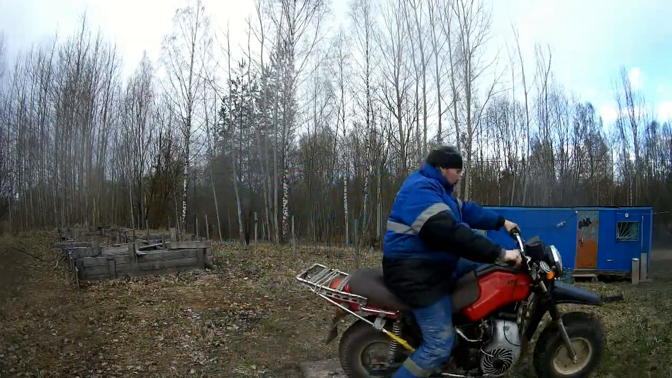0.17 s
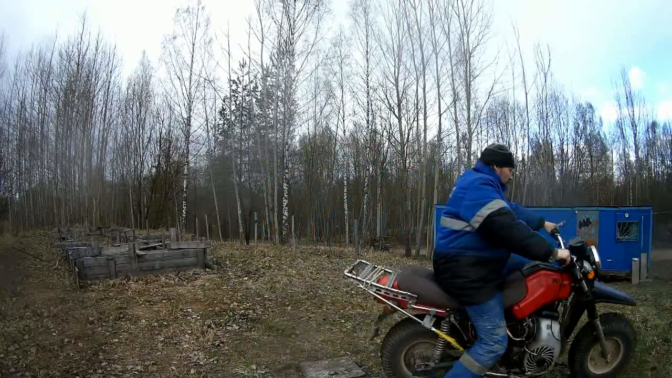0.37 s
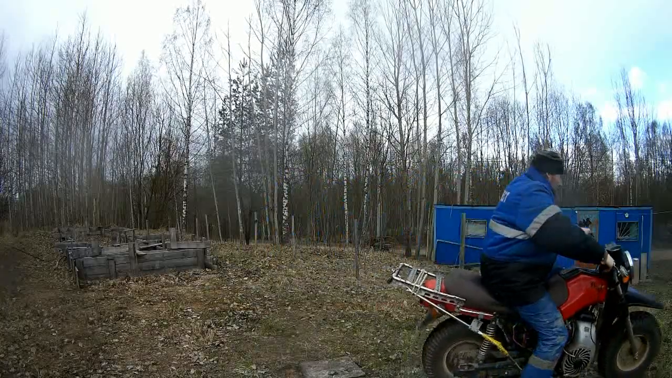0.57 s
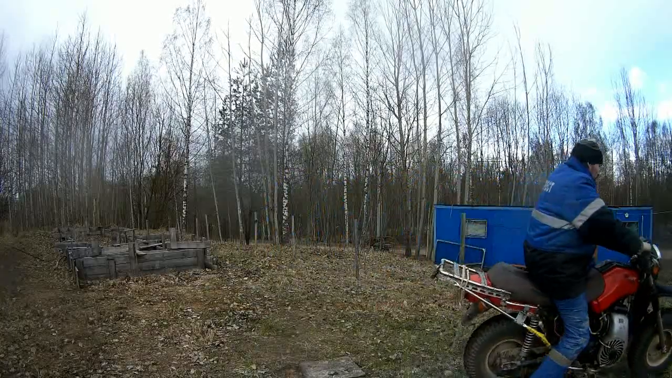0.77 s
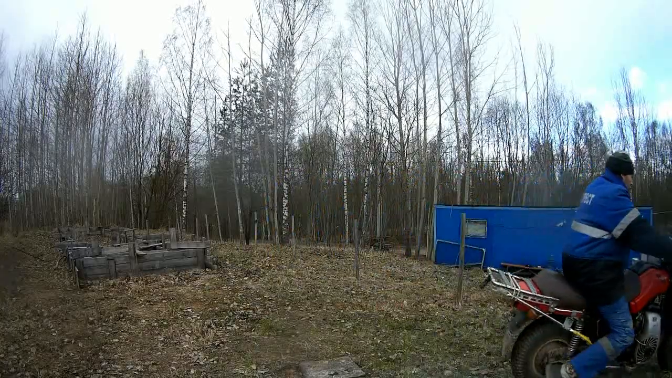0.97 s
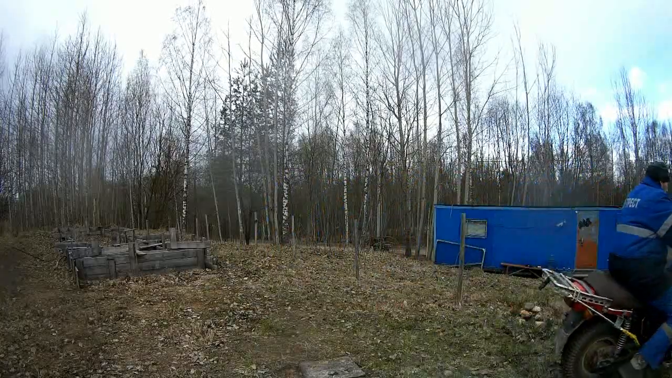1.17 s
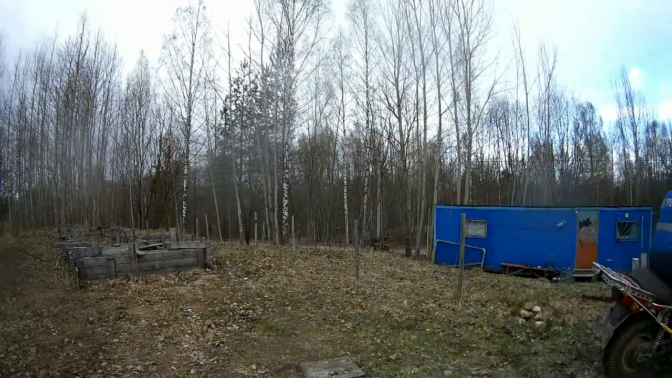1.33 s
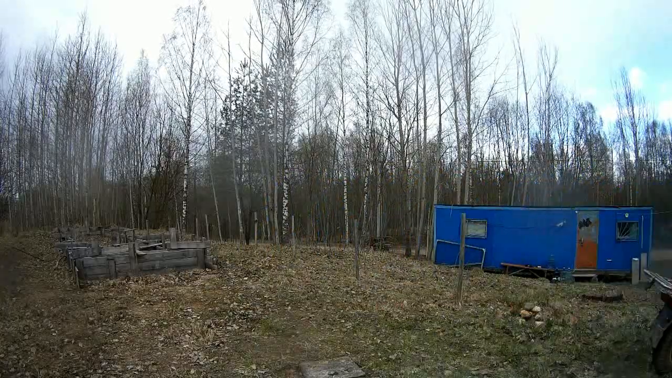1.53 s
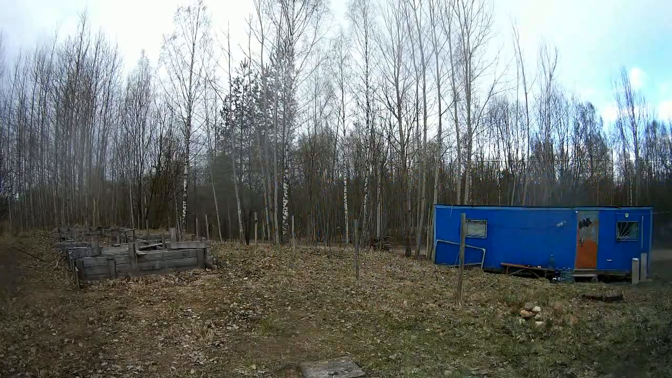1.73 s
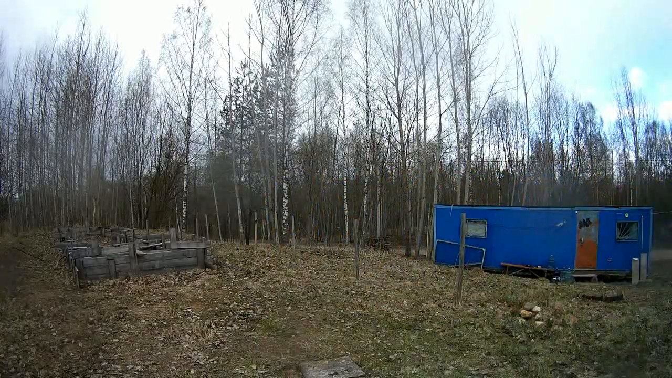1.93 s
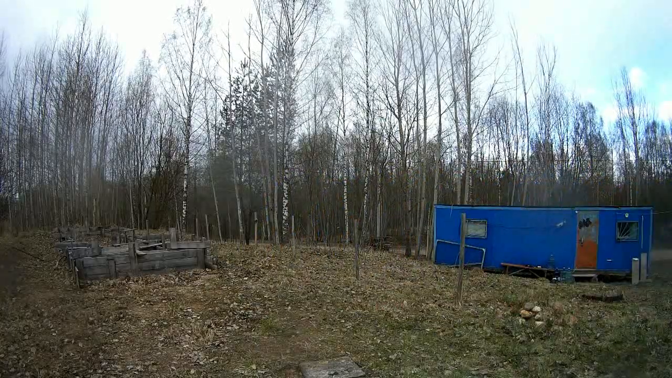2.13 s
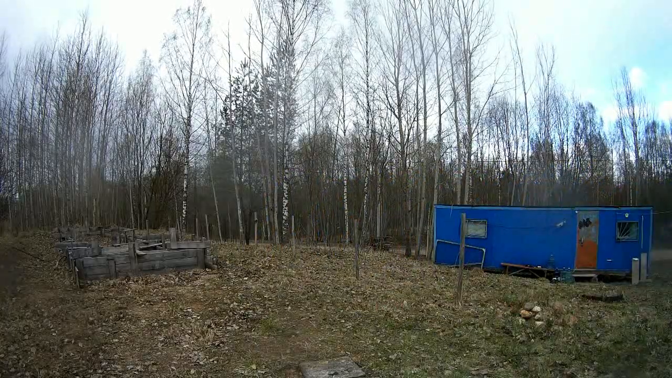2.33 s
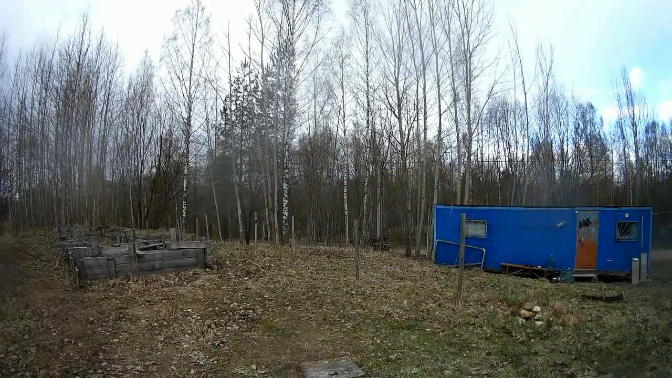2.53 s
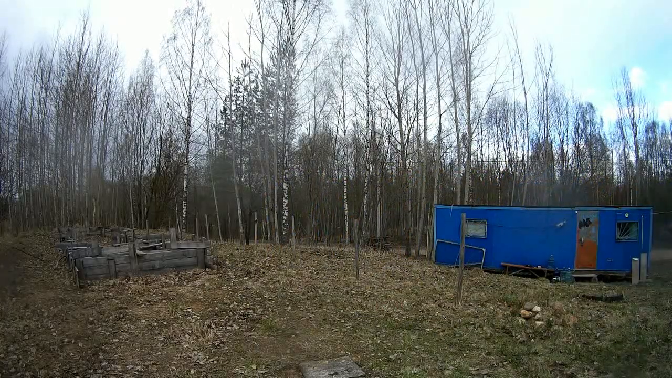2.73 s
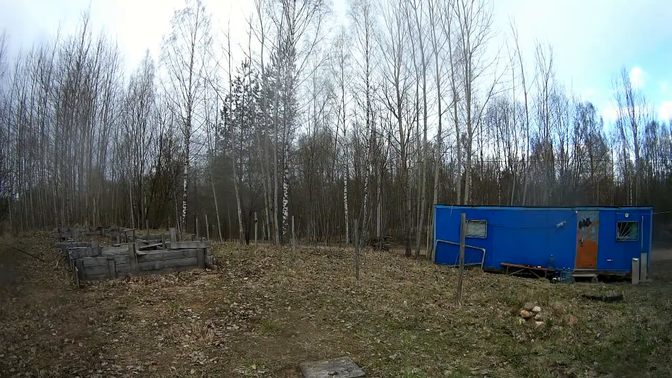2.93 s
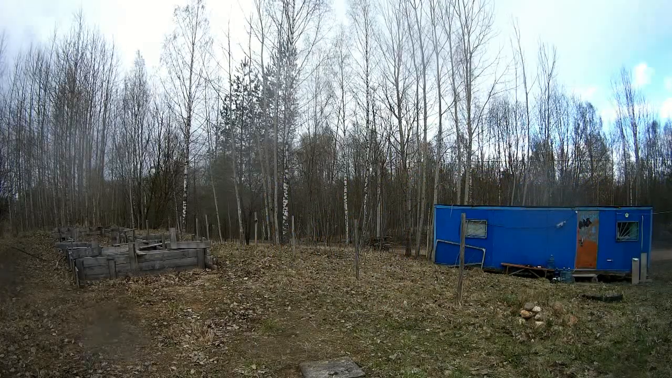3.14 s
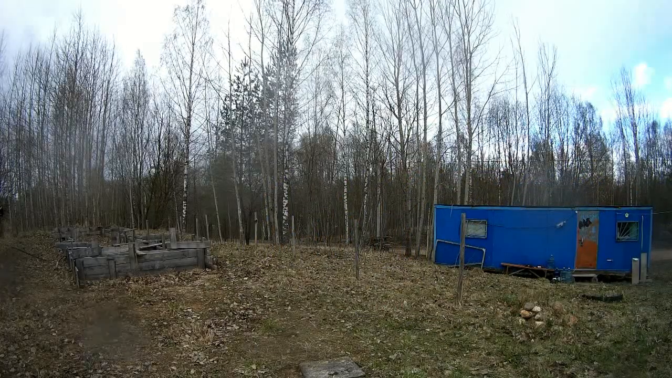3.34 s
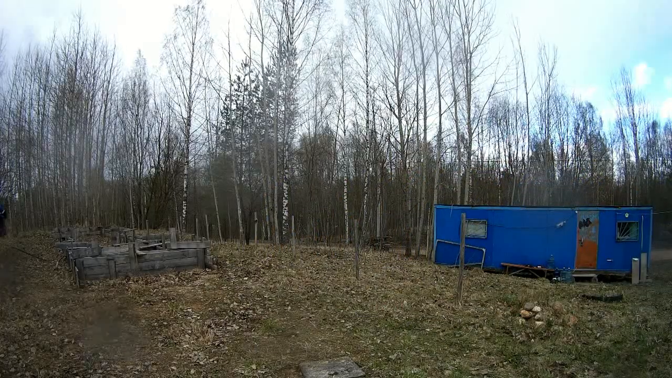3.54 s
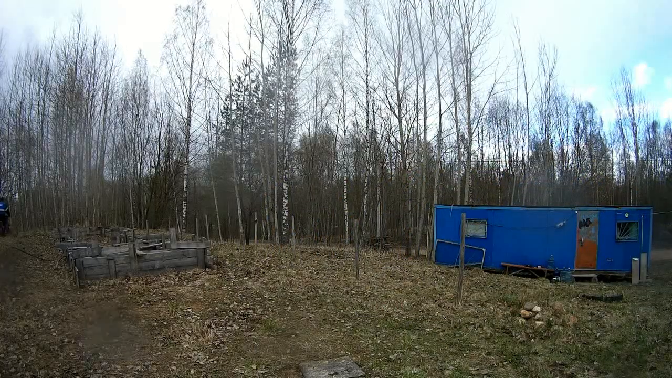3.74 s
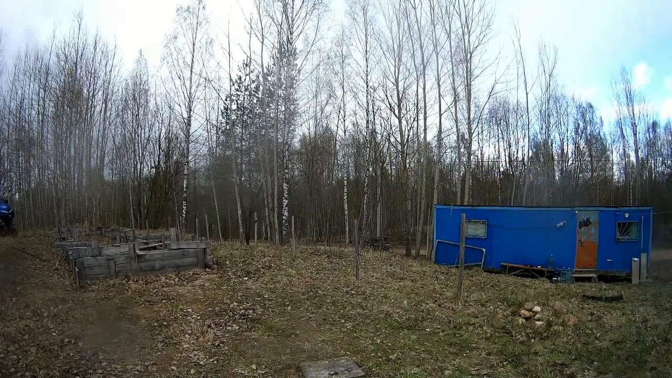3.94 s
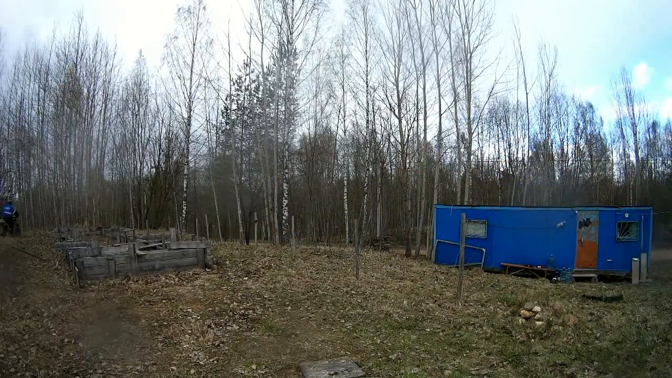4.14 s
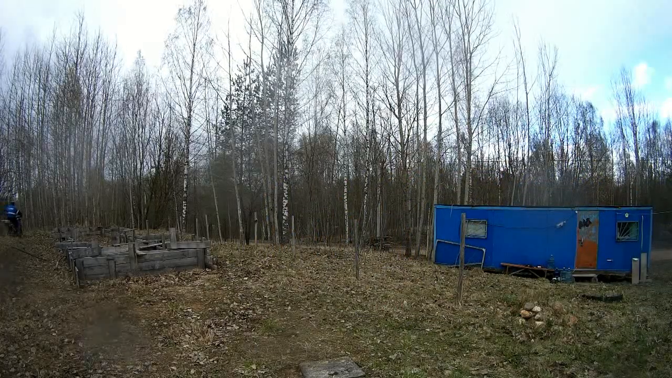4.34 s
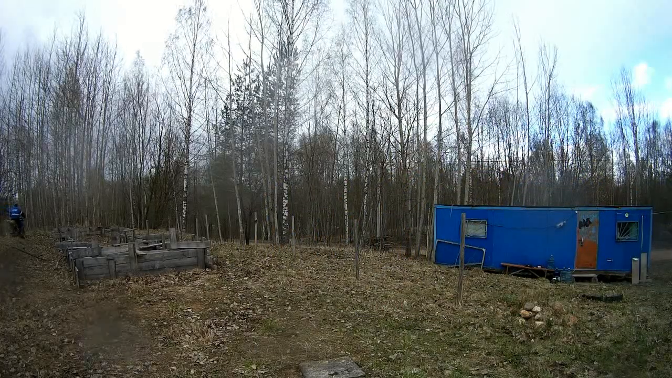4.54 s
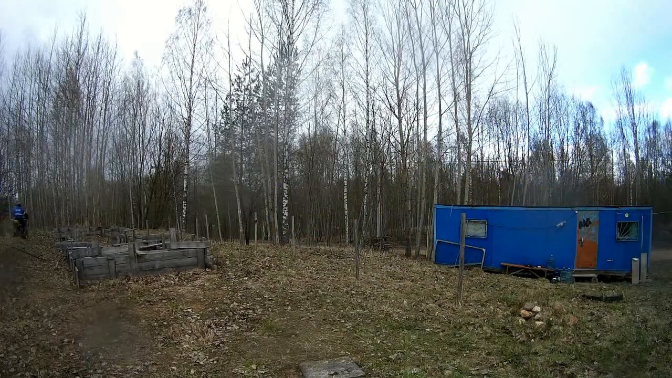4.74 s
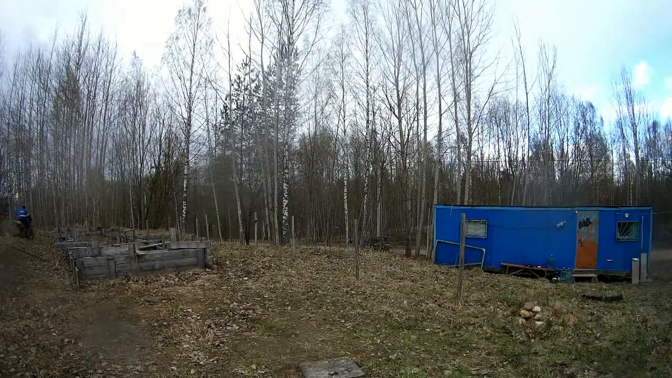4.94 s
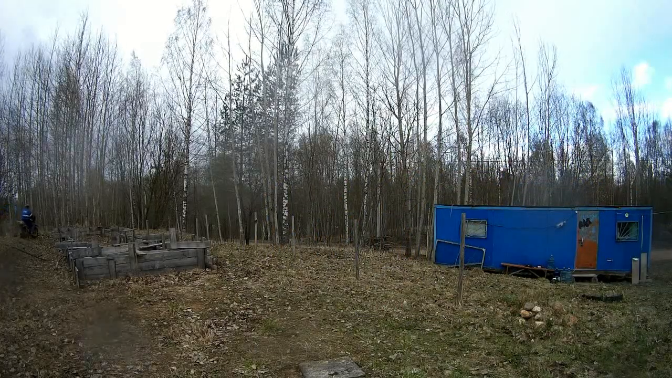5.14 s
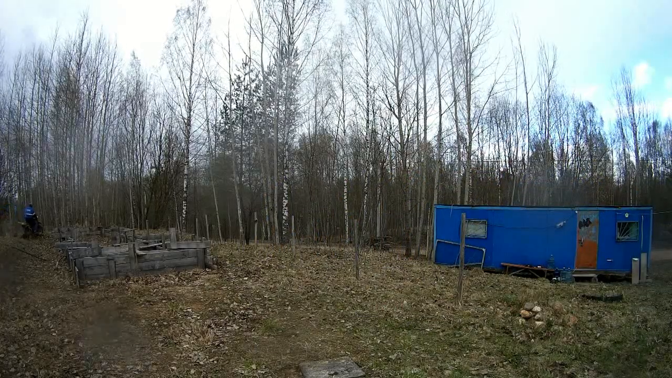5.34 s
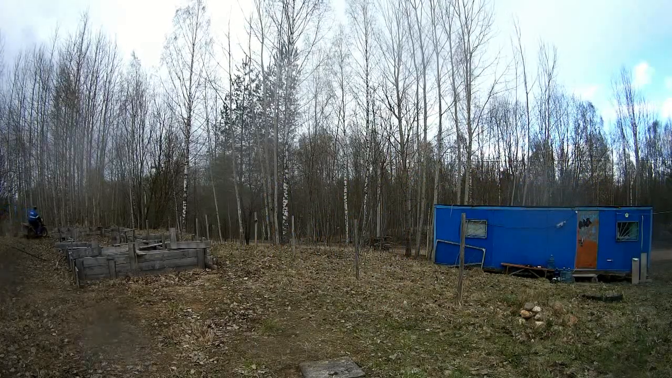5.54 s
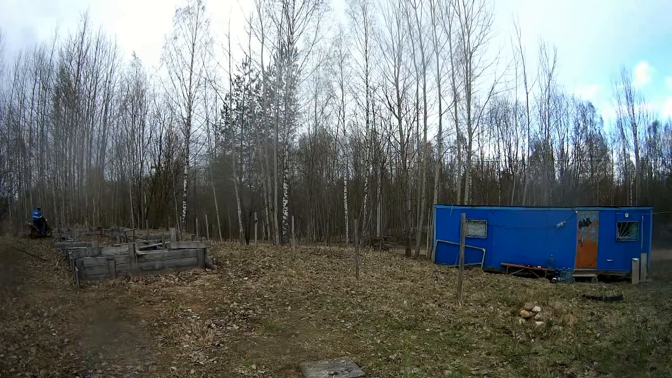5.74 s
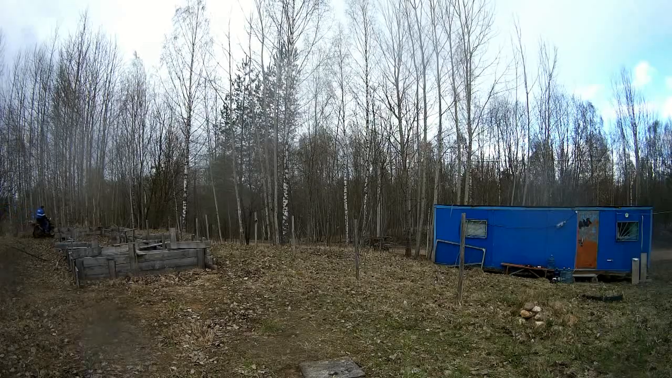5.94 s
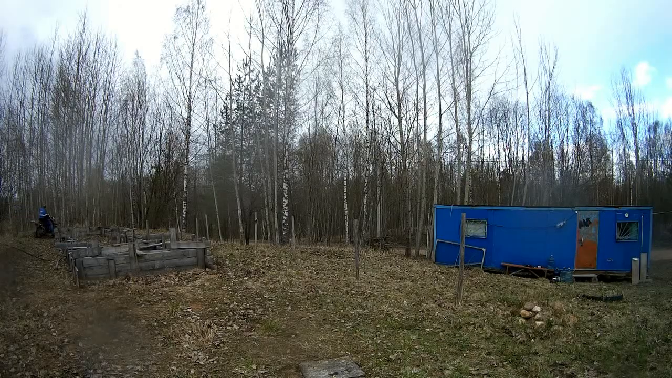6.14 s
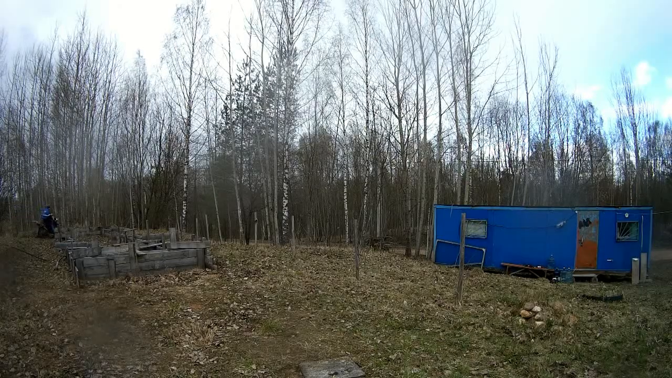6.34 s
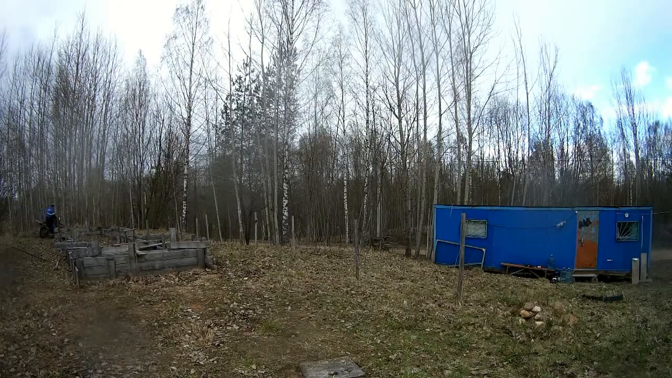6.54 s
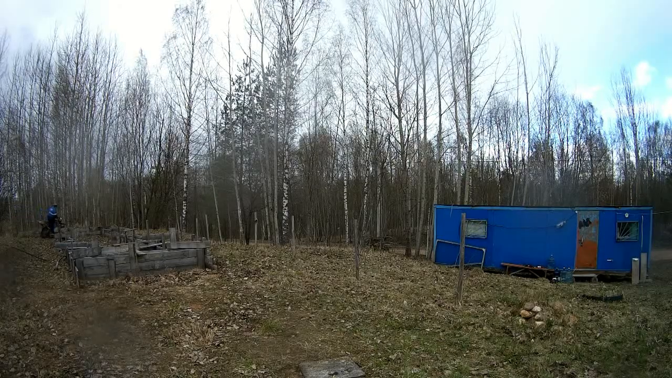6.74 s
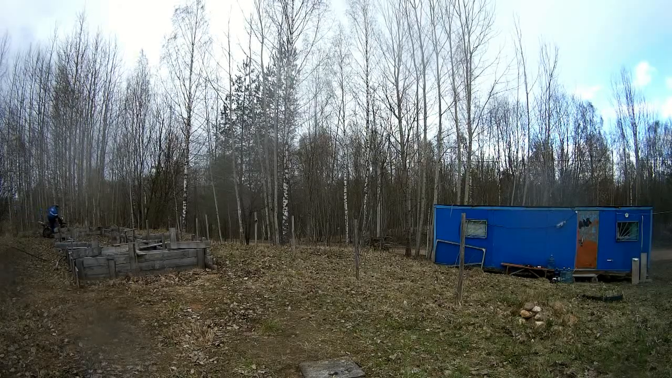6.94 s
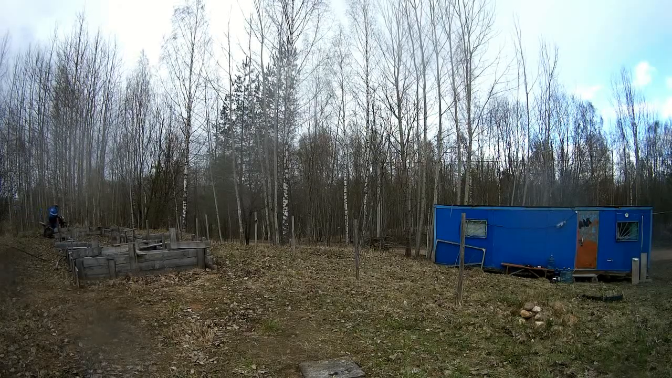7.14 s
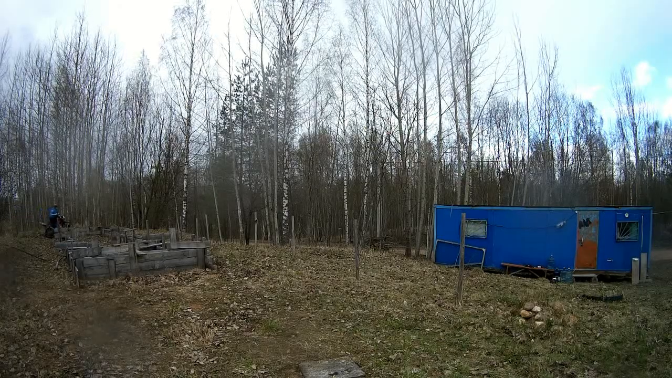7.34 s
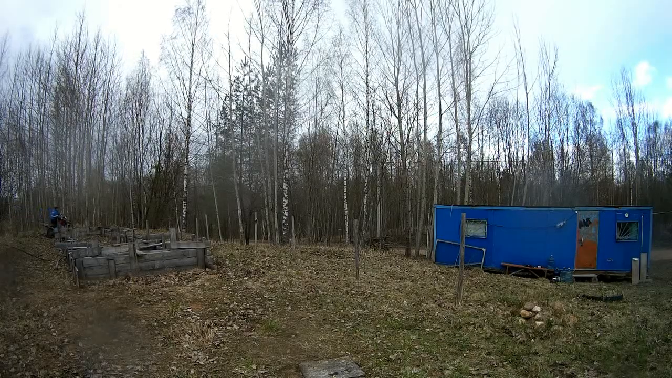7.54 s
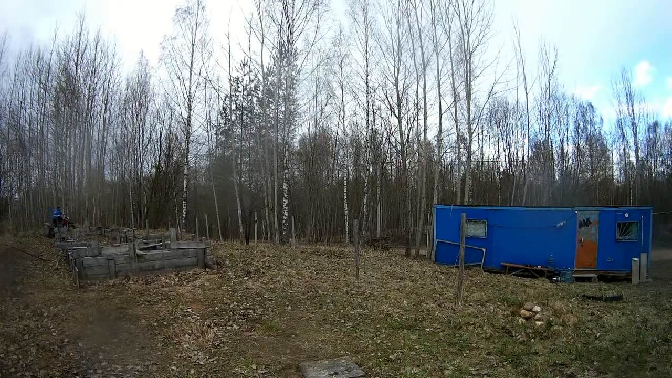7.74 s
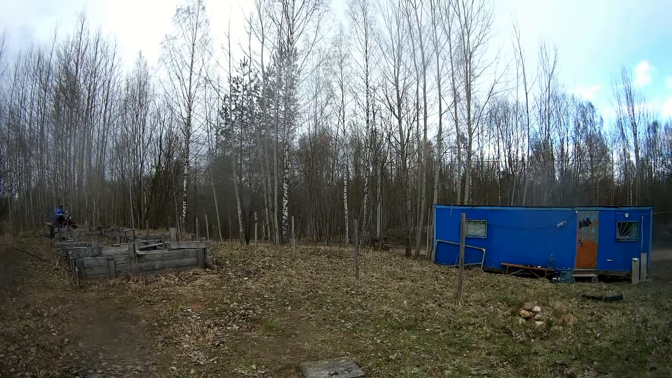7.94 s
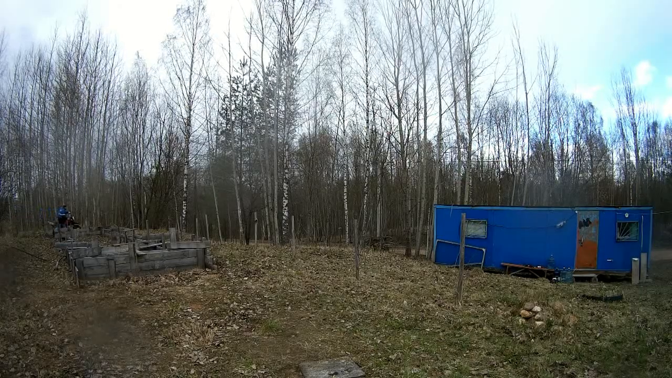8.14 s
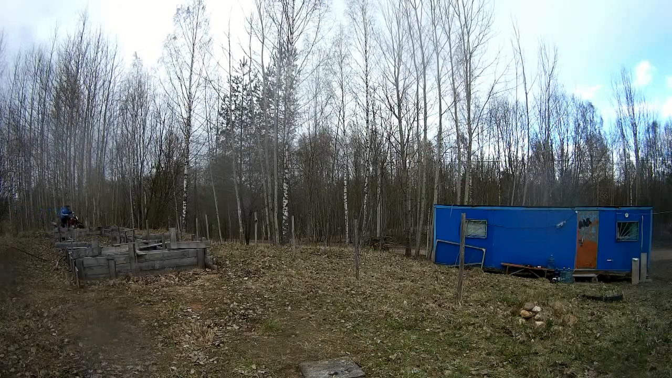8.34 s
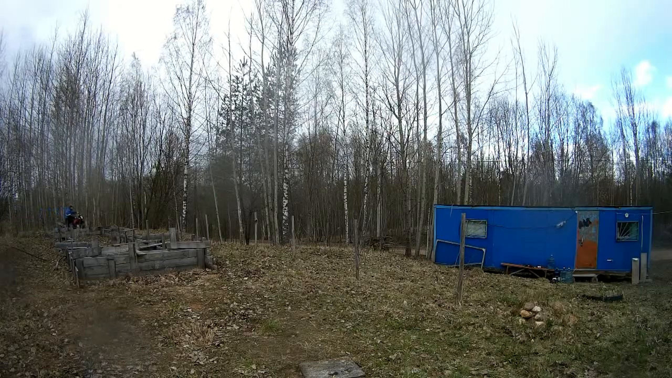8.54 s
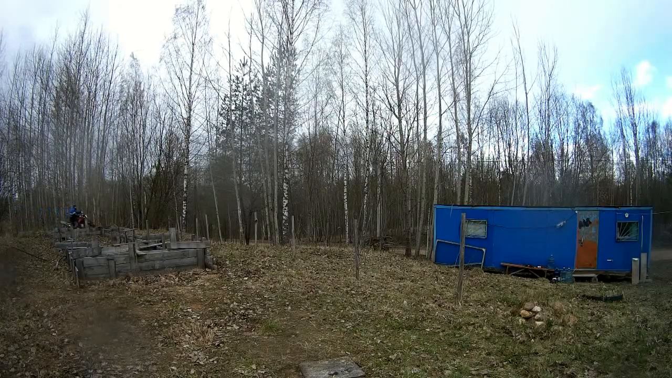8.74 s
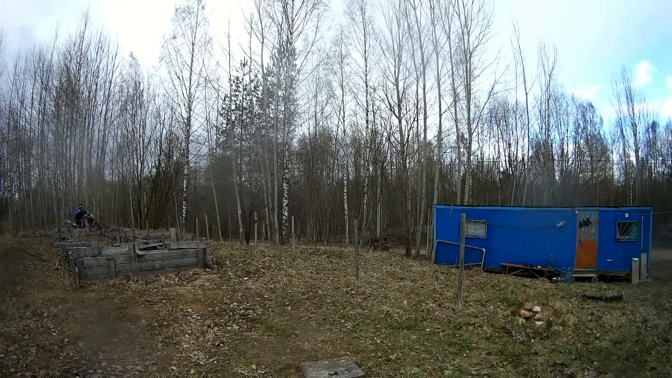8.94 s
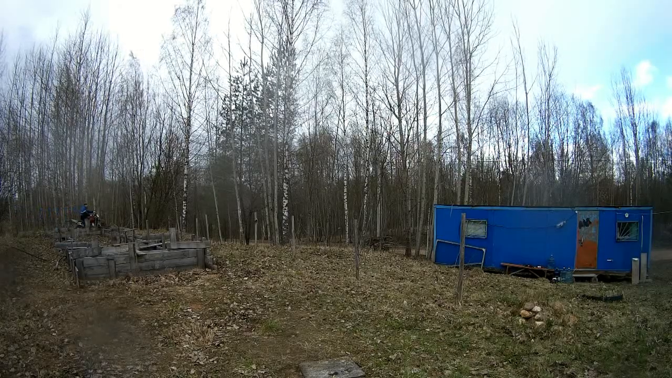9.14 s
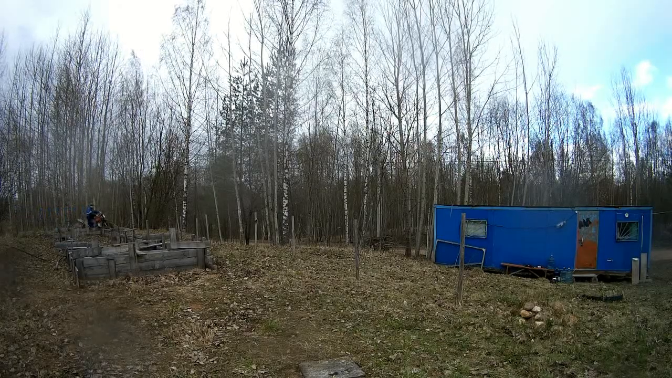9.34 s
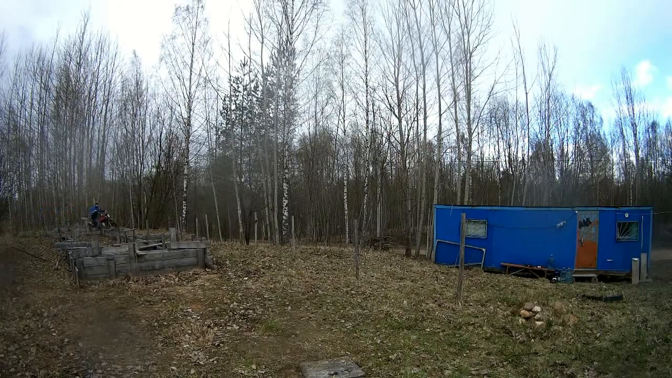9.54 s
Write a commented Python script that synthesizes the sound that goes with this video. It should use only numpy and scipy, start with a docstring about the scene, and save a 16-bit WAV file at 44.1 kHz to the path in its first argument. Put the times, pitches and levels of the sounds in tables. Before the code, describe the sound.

Close buzzy two-stroke motorbike rolls away, cuts suddenly to the same bike far off, idling unevenly then revving, with wind buffeting, leaf scuffs and twig snaps.

```python
"""In a forest clearing, a small two-stroke motorcycle rolls past close by, blips, pulls away and coasts. Then
the scene changes: the bike is far across the clearing, where it idles, revs, drops back and pulls again. There,
wind buffets the microphone, twigs and dry leaves crack nearby and thin high pips repeat for a while. Each turn
of the crank sends a gas pulse, weak where nothing burned, into resonances of silencer and tail pipe. Wind,
leaves and hiss are shaped noise; twigs are short noise bursts through a resonance."""
import sys
import numpy as np
from scipy import signal
from scipy.fft import rfft, irfft, next_fast_len
from scipy.io import wavfile
from scipy.ndimage import uniform_filter1d

SR = 44100
rng = np.random.default_rng(int(sys.argv[2]) if len(sys.argv) > 2 else 0)


def int16_out(signal):
    """Quantize to a 16-bit WAV file."""
    q = np.round(np.clip(np.atleast_2d(signal).T, -1, 1) * 32767)
    wavfile.write(sys.argv[1], SR, q.astype(np.int16))


N = 427769
TIME = np.arange(N) / SR
FAR_FROM_S = 3.16  # from here on the bike is across the clearing
CRUISE_PER_S = 40  # reference speed, strokes per second


def from_db(db):
    """Decibels to gain."""
    return 10 ** (np.asarray(db) / 20)


def rms_one(x):
    """Scale to unit rms."""
    return x / np.sqrt(np.mean(x ** 2) + 1e-20)


def in_time(rows):
    """Each column of a breakpoint curve, read at every sample."""
    s, *columns = np.transpose(rows)
    return [np.interp(TIME, s, c) for c in columns]


def drift(rate):
    """Random wander of unit rms: straight lines between `rate` random points per second."""
    knots = rng.standard_normal(int(N / SR * rate) + 2)
    return rms_one(np.interp(TIME * rate, np.arange(len(knots)), knots))


def lagging(x, lag_s, start):
    """Follow a control sluggishly, from a starting value."""
    r = np.exp(-1 / (lag_s * SR))
    return start + signal.lfilter([1 - r], [1, -r], x - start)


def swells(rows, edge_s):
    """Gain of events (start, length, dB) that rise, hold and fall."""
    gain = 0
    for s, length, db in rows:
        end = s + max(length, edge_s)
        corners = [s - edge_s, s + edge_s / 2, end, end + edge_s]
        gain = gain + from_db(db) * np.interp(TIME, corners, [0, 1, 1, 0])
    return gain


def colour(x, spectrum):
    """Give a sound a spectrum, drawn over log frequency; rms 1."""
    hz, db = np.transpose(spectrum)
    size = next_fast_len(N)
    bins = np.maximum(np.fft.rfftfreq(size, 1 / SR), 1)
    gain = from_db(np.interp(np.log(bins), np.log(hz), db))
    return rms_one(irfft(rfft(x, size) * gain, size)[:N])


def noise(spectrum):
    """Coloured noise of rms 1."""
    return colour(rng.standard_normal(N), spectrum)


def resonate(x, modes):
    """Parallel resonances with alternating signs."""
    out = 0
    for k, (hz, width, db) in enumerate(modes):
        r = np.exp(-np.pi * width / SR)
        poles = [1, -2 * r * np.cos(2 * np.pi * hz / SR), r * r]
        ring = signal.lfilter([1, 0, -1], poles, x + 1e-18)
        out = out + (-1) ** k * from_db(db) * (1 - r * r) / 2 * ring
    return out


def cut(x, hz, kind, order=2):
    """Butterworth low- or high-pass."""
    return signal.sosfilt(signal.butter(order, hz, kind, fs=SR, output="sos"), x + 1e-18)


def even(x):
    """Level out the slow swell, keep the single beats."""
    power = uniform_filter1d(uniform_filter1d(x * x, size=4400), size=4400)
    return x / np.sqrt(np.maximum(power, 0) + 1e-4 * np.mean(x * x))


def echoes(x, paths):
    """The sound plus later copies of it, given as (delay s, dB)."""
    return x + sum(from_db(db) * np.interp(TIME - delay, TIME, x, left=0) for delay, db in paths)


def forest(x, t60, wet_db):
    """Trunks scatter the sound into a thin, dying tail that starts 20 ms late."""
    t = np.arange(SR) / SR
    tail = rng.standard_normal(SR) * from_db(-60 * t / t60) * (t > .02)
    return x + from_db(wet_db) * signal.fftconvolve(x, tail / np.linalg.norm(tail))[:N]


# Spectrum of the steady hiss. Each row: frequency in Hz, relative level in dB per Hz.
HISS = [(100, 21), (2000, 5), (4500, 4.5), (7000, -3), (9000, -9.5), (12000, -4.5), (14000, -4),
        (16000, -14.5)]


def hiss():
    """A steady bed of shaped noise."""
    return from_db(-49.5) * noise(HISS)


# The breeze on the microphone. Each row: time in seconds, relative rumble level in dB.
BREEZE = [(3.2, -27), (4.2, -20), (5.0, -26), (5.6, -26.5), (6.2, -23), (7.1, -20.5), (8.3, -26.5),
          (9.3, -22), (9.7, -37)]
# The strongest gusts. Each row: start in seconds, length in seconds, relative rumble level in dB.
GUSTS = [(3.516, 0.039, -15), (3.735, 0.021, -26), (3.81, 0.047, -19), (4.188, 0.093, -19),
         (4.414, 0.054, -30), (4.796, 0.026, -27), (5.007, 0.041, -16.5), (5.052, 0.089, -23.5),
         (6.124, 0.063, -17.5), (6.475, 0.032, -12.5), (6.7, 0.037, -17), (6.98, 0.038, -25),
         (7.054, 0.05, -21), (7.528, 0.05, -16.5), (7.698, 0.047, -16)]
# Spells of higher flutter. Each row: start in seconds, length in seconds, relative level in dB.
FLUTTERS = [(3.32, 0.11, -42), (3.57, .93, -43.5), (4.59, 0.48, -44.5), (5.24, 0.39, -41.5),
            (5.79, 0.21, -53.5), (6.84, 0.14, -46.5)]
# Faint flutter between the spells, dying down. Each row: time in seconds, relative level in dB.
CALM_FLUTTER = [(5.7, -51.5), (6.5, -52.5), (7.5, -51.5), (8, -64.5)]
# Spectra of the wind's three layers. Each row: frequency in Hz, relative level in dB per Hz.
RUMBLE = [(15, -7), (30, -15.5), (45, 2), (70, 3), (100, -5.5), (140, -4), (300, -30), (1000, -72)]
BUFFET = [(60, 1.5), (120, -16), (170, -1.5), (290, 1), (380, -8.5), (500, -21), (1000, -23), (3000, -73.5)]
FLUTTER = [(250, -6.5), (450, 0), (800, -1), (1100, -8), (1350, -12.5), (1650, -13.5), (2000, -74),
           (5000, -67)]
EDDIES_PER_S = 14  # pace of the slow unevenness


def wind():
    """Eddies on the microphone: rumble, lumpy buffeting and, in spells, a higher flutter."""
    breeze = from_db(in_time(BREEZE)[0] + 2.5 * drift(EDDIES_PER_S))
    gusts = swells(GUSTS, edge_s=0.013) * from_db(1.0)
    rumble_db = 20 * np.log10(np.maximum(breeze, gusts))
    flutter_gain = from_db(in_time(CALM_FLUTTER)[0]) + swells(FLUTTERS, edge_s=0.021)
    flutter_db = 20 * np.log10(flutter_gain) + 2.5 * drift(EDDIES_PER_S)
    eddies = from_db(1.94 * drift(90))  # fast lumps
    rumble = from_db(rumble_db - 2.0) * even(noise(RUMBLE))
    # buffeting follows rumble and flutter halfway
    buffet = from_db((rumble_db + flutter_db) / 2 + 12.5) * even(noise(BUFFET) * eddies)
    flutter = from_db(flutter_db + 3.5) * even(noise(FLUTTER) * eddies)
    return rumble + buffet + flutter


# A scuff in dry leaves. Each row: time in seconds, level in dB.
SCUFF = [(3.89, -76), (3.915, -27), (3.95, -29), (3.985, -37), (4.12, -42), (4.2, -85)]
# Spectrum of the leaves. Each row: frequency in Hz, relative level in dB per Hz.
LEAVES = [(500, -5), (1000, 2), (1600, -9), (2200, -22.5), (3300, -19), (4500, -27), (8000, -48),
          (15000, -57)]


def leaves():
    """Dry leaves are scuffed: noise whose level flickers fast, for a crackly grain."""
    grain = rng.standard_normal(N) * from_db(2.3 * drift(300))
    return from_db(in_time(SCUFF)[0]) * colour(grain, LEAVES)


# Snapping twigs. Each row: start in seconds, peak level in dB, resonance in Hz, its width in Hz.
TWIGS = [(5.398, -30, 3570, 250), (5.632, -32, 3500, 700), (5.796, -16, 1090, 350), (6.564, -22, 1490, 900),
         (7.038, -16, 1010, 400)]


def twigs():
    """Each twig snaps: a burst of noise, dying within milliseconds, rings one resonance."""
    out = np.zeros(N)
    t = np.arange(SR // 10) / SR
    for s, db, hz, width in TWIGS:
        burst = rng.standard_normal(len(t)) * np.exp(-t / 0.0015)
        snap = resonate(burst, [(hz, width, 0)])
        snap = cut(snap, min(1.43 * hz, SR / 3), "low", order=3)
        start = int(s * SR)
        out[start:start + len(t)] += from_db(db) * snap / abs(snap).max()
    return out


def pips():
    """Thin pips of narrow-band noise near 2.5 kHz repeat about eight times a second."""
    times = 4.37 + .13 * np.arange(8)
    swell = from_db(-55.5) * sum(np.exp(-((TIME - s) / 0.012) ** 2) for s in times)
    band = [(2494, 79, 0)]
    return swell * rms_one(resonate(resonate(rng.standard_normal(N), band), band))


# Crankshaft speed, close by and far off. Each row: time in seconds, strokes per second.
SPEED_NEAR = [(0.0, 41.5), (0.076, 40.88), (0.28, 35.02), (0.515, 47.31), (0.903, 44.33), (1.048, 39.96),
              (1.286, 38.27), (1.808, 40.37), (2.078, 35.15), (2.248, 34.62), (2.407, 28.93),
              (2.646, 29.63), (2.867, 37.03), (2.994, 35.52), (3.16, 39.88)]
SPEED_FAR = [(3.16, 27.47), (3.912, 23.54), (5.038, 22.09), (5.48, 18.6), (6.155, 21.4), (6.558, 38.73),
             (6.986, 34.71), (7.697, 48.8), (7.976, 46.6), (8.393, 46.5), (8.851, 41.85), (9.249, 30.45),
             (9.7, 29.71)]


def speed():
    """Strokes per second."""
    return np.where(TIME < FAR_FROM_S, in_time(SPEED_NEAR)[0], in_time(SPEED_FAR)[0])


# On open throttle every stroke fires; coasting or idling, only every few.
# Each row: start in seconds, strokes per firing.
THROTTLE = [(0, 1), (.52, 4), (.71, 5), (.825, 1), (2.0, 3), (2.59, 2), (2.78, 1), (3.16, 2), (3.46, 3),
            (5.23, 2), (6.19, 1), (6.54, 3), (6.89, 2), (7.06, 1), (9.0, 3), (9.24, 1)]


def strokes_per_firing():
    """The throttle setting, held until the next."""
    s, every = np.transpose(THROTTLE)
    return every[np.searchsorted(s, TIME, side="right") - 1]


def settled():
    """The burning settles: 0 while firing is ragged, towards 1 the longer the throttle stays open."""
    return lagging(1. * (strokes_per_firing() == 1), lag_s=.35, start=0.067)


def strokes():
    """The sample at which the exhaust port opens on each turn, and whether the charge burned."""
    turns = np.cumsum(speed()) / SR + .79
    far = int(FAR_FROM_S * SR)
    turns[far:] += .59 - turns[far] % 1  # the far bike starts at its own crank angle
    at = np.flatnonzero(np.diff(np.floor(turns)) > 0)
    setting = np.searchsorted(np.transpose(THROTTLE)[0], at / SR, side="right")
    since_change = np.arange(len(at)) - np.searchsorted(setting, setting)
    return at, since_change % strokes_per_firing()[at] == 0


def pulses(at, fired, unfired_db, spread_db, jitter_s):
    """One gas pulse a stroke, at another level where nothing burned; size and timing vary at random."""
    size, late = rng.standard_normal((len(at), 2)).T
    where = np.clip(at + (late * jitter_s * SR).astype(int), 0, N - 1)
    out = np.zeros(N)
    out[where] = from_db(np.where(fired, 0, unfired_db) + spread_db * size)
    return out


def gas_rush(clicks, decay_s):
    """A dying burst of turbulence after each pulse, with the energy of the pulse."""
    r = np.exp(-1 / (decay_s * SR))
    swell = signal.lfilter([np.sqrt(1 - r * r)], [1, -r], clicks + 1e-18)
    return swell * rng.standard_normal(N)


HEAT_LIFT = 0.062  # share of pitch gained between cold and cruising


def exhaust_ring(x, modes, lift):
    """Frequent firing heats the gas, sound travels faster, and the resonances rise in pitch."""
    firings = speed() / strokes_per_firing()
    heat = lagging(firings / CRUISE_PER_S, lag_s=0.3, start=1.74)
    # the resonances run on a clock of their own, faster when hot
    clock = np.cumsum(1 + lift * (heat - 1))
    ticks = np.arange(int(clock[-1]))
    return np.interp(clock, ticks, resonate(np.interp(ticks, clock, x), modes))


# Low exhaust resonances, tuned at cruising heat. Each row: frequency in Hz, width in Hz, level in dB.
THUMP = [(45.5, 32, -6), (166.8, 17.5, 4.5), (201.5, 33.7, -1.5)]
BOOM = [(327.3, 65.9, 8), (349.7, 24.5, -1), (498.5, 59, -14)]
CHUG = [(259, 112, 1.07)]
SILENCER = [(332.6, 13, 0)]


def low_exhaust(at, fired):
    """Firings thump in the silencer; unfired puffs gurgle and keep its cavity humming."""
    over_cruise = speed() - CRUISE_PER_S
    blows = pulses(at, fired, unfired_db=-23, spread_db=-0.4, jitter_s=.00005)
    puffs = pulses(at[~fired], fired[~fired], unfired_db=5.0, spread_db=2.4, jitter_s=.00005)
    # the gurgle weakens as the engine speeds up
    gurgle = from_db(-15 - .5 * over_cruise) * gas_rush(puffs, decay_s=.035)
    gurgle = cut(gurgle + from_db(-17) * gas_rush(blows, decay_s=.015), 78, "high")
    flow = blows + gurgle
    thump = cut(exhaust_ring(flow, THUMP, HEAT_LIFT), 295, "low", order=4)
    # less chug once the burning settles; it carries across the clearing better than the boom
    chug_db = 4.5 - 7 * settled() + 0.18 * over_cruise + 4 * (TIME > FAR_FROM_S)
    chug = from_db(chug_db) * exhaust_ring(flow, CHUG, HEAT_LIFT)
    # ragged firings also feed the hum; the cavity cools most, so its pitch moves most
    hum_feed = puffs + from_db(-5) * (1 - settled()) * blows
    hum = from_db(5) * exhaust_ring(hum_feed, SILENCER, lift=0.14)
    boom = exhaust_ring(flow, BOOM, HEAT_LIFT) + hum - chug
    return thump, cut(cut(boom, 130, "high"), 534, "low", order=3)


# The tail pipe's own tone. Each row: frequency in Hz, width in Hz, level in dB.
PIPE = [(1105.6, 35, 0.011)]


def barking(at, fired, modes, top_hz):
    """Each pulse runs up and down the tail pipe, gas rushing behind; at speed more of the pipe rings."""
    late = int(.003 * SR)
    cracks = pulses(at + late, fired, unfired_db=-9, spread_db=1.2, jitter_s=.00002)
    # less turbulence once the burning settles
    rush = from_db(-3 - 12 * settled()) * gas_rush(cracks, decay_s=.03)
    returns = echoes(cracks, [(.0035, -6.5), (.0062, -4.5), (.0106, -6.5), (.0151, -4.5)])
    broad_db = 1 + 1.02 * (speed() - CRUISE_PER_S)
    ring = exhaust_ring(returns / np.sqrt(2) + rush * np.sqrt(2), modes, HEAT_LIFT)
    tone = exhaust_ring(cracks + rush / 2, PIPE, HEAT_LIFT)
    bark = from_db(broad_db) * ring + tone
    return cut(cut(bark, 550, "high", order=3), top_hz, "low", order=4)


# Bike across the clearing, upper layers. Each row: time in seconds, bark level in dB, clatter level in dB.
FAR = [(3.2, -36.5, -64), (3.4, -37, -55), (3.7, -46, -66), (4.2, -42.5, -65), (5.7, -48, -63),
       (6.1, -39, -61), (6.4, -34.5, -53.5), (6.9, -36.5, -54.5), (7.4, -30.5, -51.5), (7.8, -31.5, -53.5),
       (8.5, -28.5, -51.5), (9.15, -35.5, -56.5), (9.7, -29, -57)]
# Its low end. Each row: time in seconds, thump level in dB, boom level in dB.
FAR_LOW = [(3.2, -29, -23.5), (4, -30.5, -34.5), (5.8, -35.5, -33.5), (6.4, -38, -26), (7.6, -30.5, -24.5),
           (8.2, -32.5, -26.5), (8.7, -26.5, -30), (9.7, -28, -41.5)]
# Its tail pipe resonances. Each row: frequency in Hz, width in Hz, level in dB.
BARK_FAR = [(738, 143, -12.5), (853, 56, -7.5), (946, 54, -2.5), (1053, 117, -3), (1179, 83, -3),
            (1477, 116, -12.5), (1540, 130, -10), (1738, 45, -12.5), (1960, 43, -45), (2595, 30, -17)]
# Its clatter spectrum. Each row: frequency in Hz, relative level in dB per Hz.
CLATTER_FAR = [(1500, -6), (2200, 2.5), (2700, 5.5), (4300, -1), (6000, -15), (8500, -25), (15000, -16.5)]


def far_bike(at, fired, thump, boom):
    """Across the clearing the beats are blurred by the trees."""
    bark_db, clatter_db = in_time(FAR)
    thump_db, boom_db = in_time(FAR_LOW)
    slaps = pulses(at, fired, unfired_db=-32, spread_db=5.5, jitter_s=0.00046)
    clatter = colour(gas_rush(slaps, decay_s=0.026), CLATTER_FAR)
    bark = barking(at, fired, BARK_FAR, top_hz=1710)
    exhaust = from_db(thump_db) * even(thump) + from_db(boom_db) * even(boom)
    exhaust = exhaust + from_db(bark_db) * even(bark)
    return forest(exhaust + from_db(clatter_db) * even(clatter), t60=.4, wet_db=-5)


# Knocks of the drive taking up slack. Each row: start in seconds, level in dB.
KNOCKS = [(.833, -38.5), (2.418, -56), (2.523, -45)]
# Spectrum of engine and drive clatter close by. Each row: frequency in Hz, relative level in dB per Hz.
CLATTER = [(1200, -30.5), (2000, 6), (2700, -2), (3300, -12), (4500, -4.5), (5500, -13.5), (7500, -20),
           (9000, -36.5), (15000, -35)]


def knocks():
    """The drive knocks as it takes up slack: bursts of clatter noise that die away."""
    level = sum(from_db(db) * (TIME > s) * np.exp(-abs(TIME - s) / 0.033) for s, db in KNOCKS)
    return level * noise(CLATTER)


# The bike rolling past and turning away.
# Each row: time in seconds, boom level in dB, bark level in dB, clatter level in dB.
NEAR = [(0.0, -11.5, -19.5, -36), (0.08, -13.5, -16.5, -41), (0.78, -12.5, -24, -46),
        (0.93, -12.5, -21, -45), (1.03, -16, -22, -51), (1.9, -16.5, -24, -56), (2.16, -16, -27.5, -50),
        (2.19, -15, -22, -47.5), (2.47, -16.5, -25, -52), (3.13, -15, -21, -47), (3.14, -17, -25.5, -53)]
# Its tail pipe resonances. Each row: frequency in Hz, width in Hz, level in dB.
BARK_NEAR = [(633, 190, -13.5), (800, 84, -7), (861, 26, -2.5), (954, 69, 0), (1017, 115, -5.5),
             (1226, 126, -6), (1398, 38, -11), (1537, 390, -17), (1760, 130, -15), (2400, 88, -36)]


def near_bike(at, fired, thump, boom):
    """Close by, each firing cracks, rings in the pipe and shakes the engine."""
    boom_db, bark_db, clatter_db = in_time(NEAR)
    thump_db = boom_db - 4.5 - 3 * settled()  # less thump once the burning settles
    slaps = pulses(at, fired, unfired_db=-4, spread_db=-1.0, jitter_s=0.00069)
    ticks = pulses(at, fired, unfired_db=-16, spread_db=5.0, jitter_s=0.0051)  # chain and loose parts
    rattle = gas_rush(slaps, decay_s=.024) + from_db(-7) * gas_rush(ticks, decay_s=.001)
    clatter = colour(rattle, CLATTER)
    bark = barking(at, fired, BARK_NEAR, top_hz=2000)
    exhaust = from_db(thump_db) * even(thump) + from_db(boom_db) * even(boom)
    exhaust = exhaust + from_db(bark_db) * even(bark)
    return forest(exhaust + from_db(clatter_db) * even(clatter), t60=0.44, wet_db=-11)


def scene():
    """The bike close by, then far off in the wind, over a steady hiss."""
    at, fired = strokes()
    thump, boom = low_exhaust(at, fired)
    far = np.clip((TIME - FAR_FROM_S) / 0.0012, 0, 1)
    close = near_bike(at, fired, thump, boom) + knocks()
    distant = far_bike(at, fired, thump, boom) + wind() + leaves() + twigs() + pips()
    return ((1 - far) * close + far * distant + hiss())[None]


def record(dry):
    """The highest peaks overload, and a steep low-pass cuts the top."""
    clipped = np.clip(dry, -.95, .95)
    return signal.sosfilt(signal.cheby2(16, 70, 16200, fs=SR, output="sos"), clipped)


dry = scene()
out = record(dry)
int16_out(out)
```